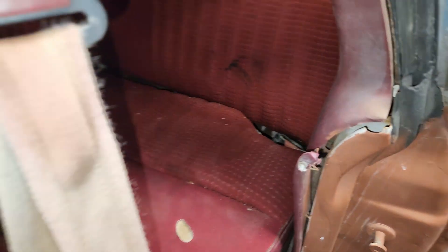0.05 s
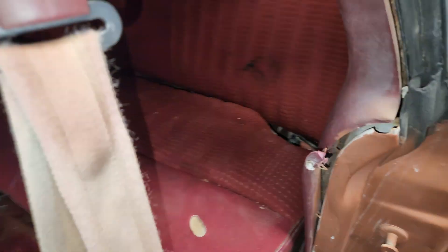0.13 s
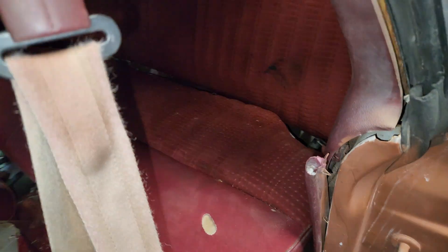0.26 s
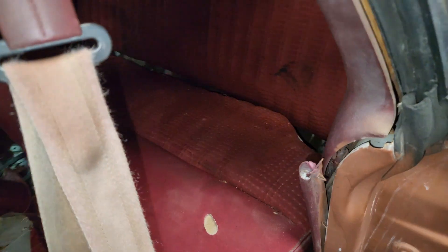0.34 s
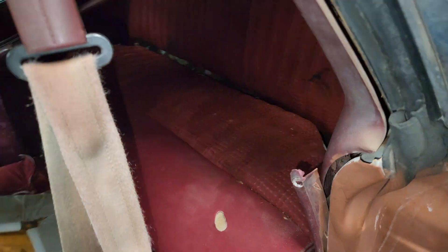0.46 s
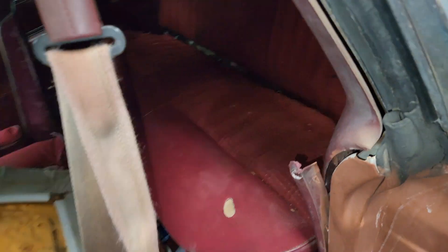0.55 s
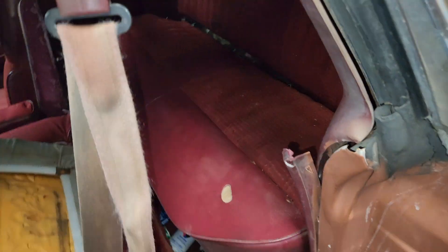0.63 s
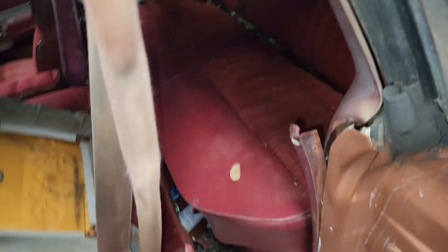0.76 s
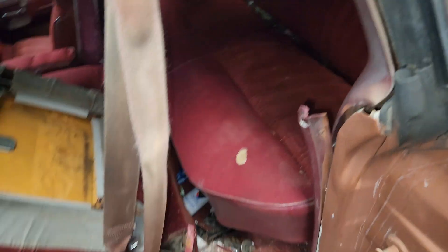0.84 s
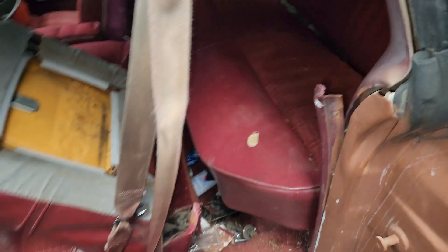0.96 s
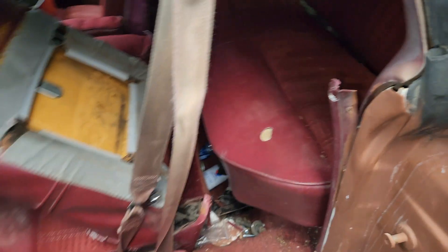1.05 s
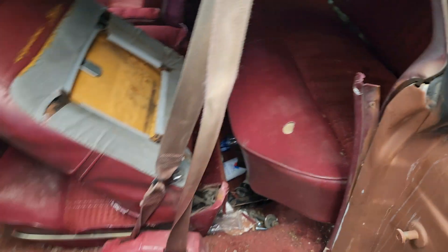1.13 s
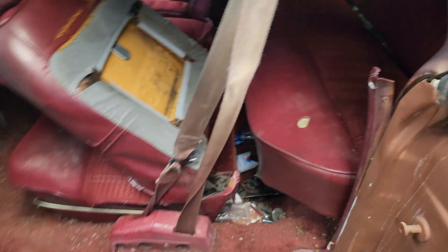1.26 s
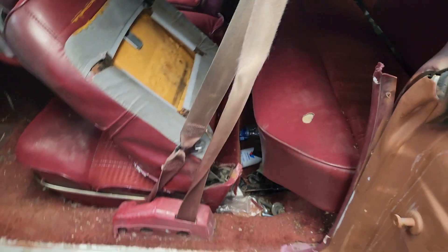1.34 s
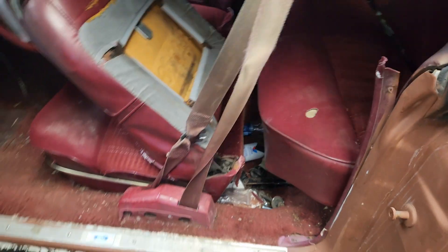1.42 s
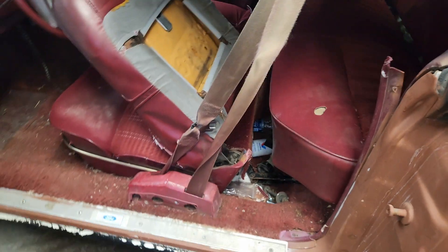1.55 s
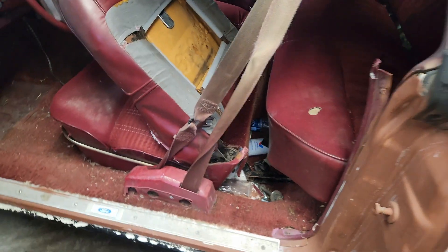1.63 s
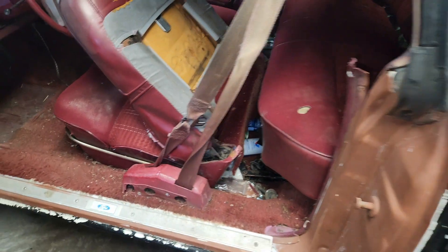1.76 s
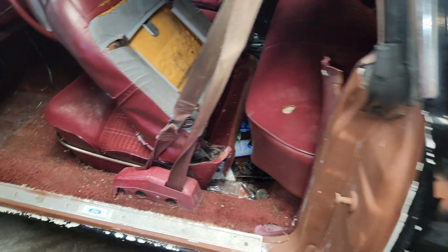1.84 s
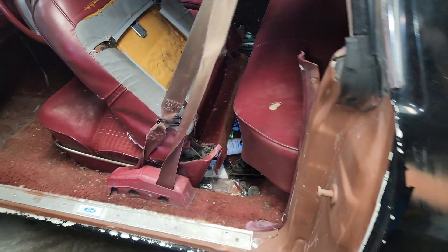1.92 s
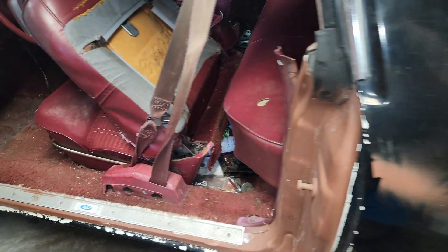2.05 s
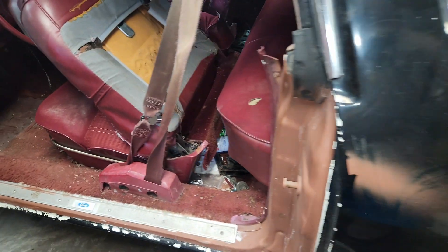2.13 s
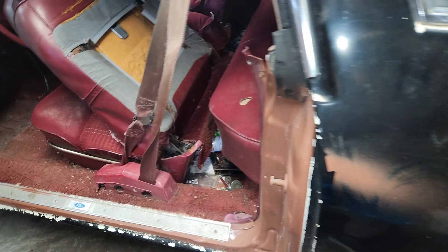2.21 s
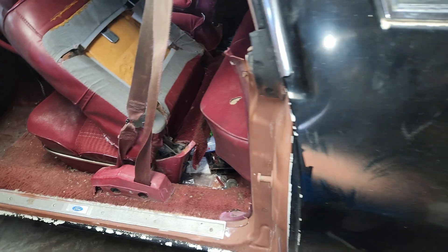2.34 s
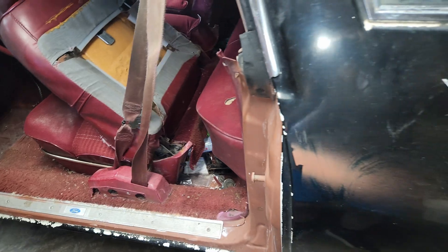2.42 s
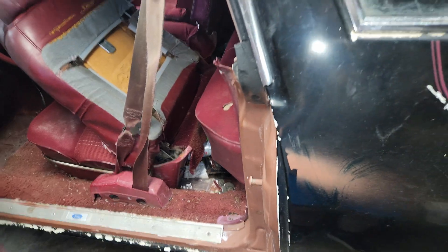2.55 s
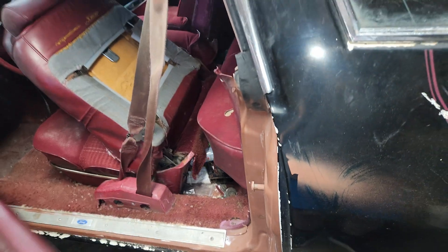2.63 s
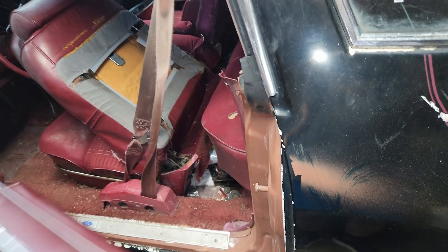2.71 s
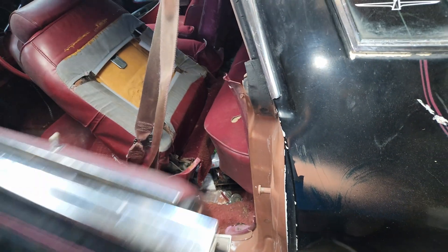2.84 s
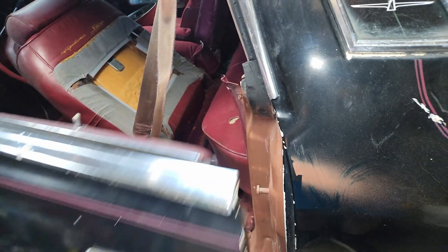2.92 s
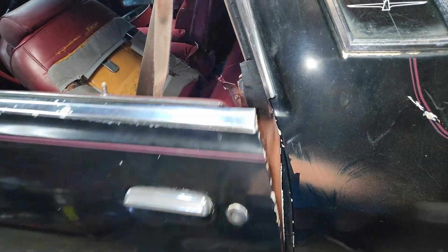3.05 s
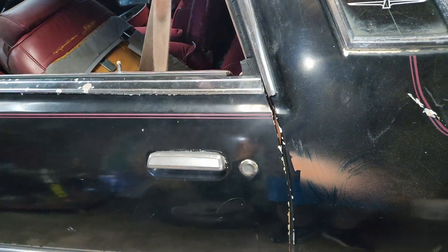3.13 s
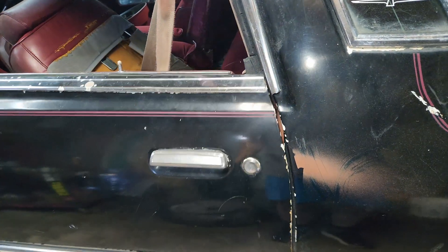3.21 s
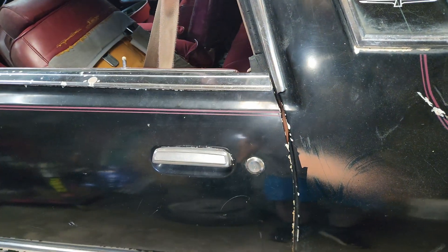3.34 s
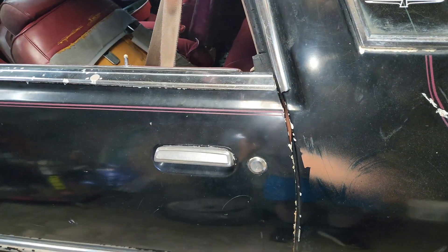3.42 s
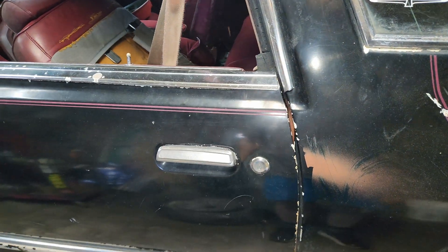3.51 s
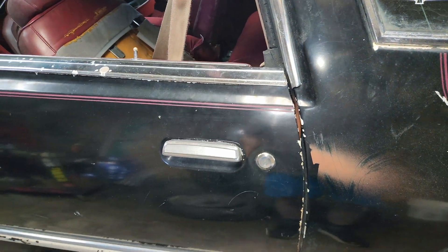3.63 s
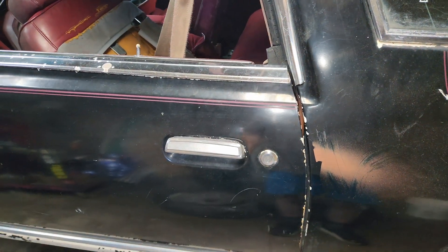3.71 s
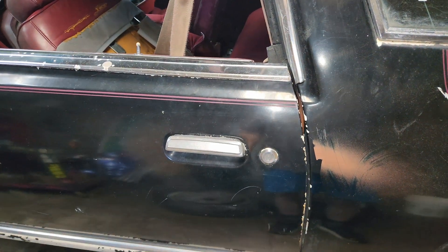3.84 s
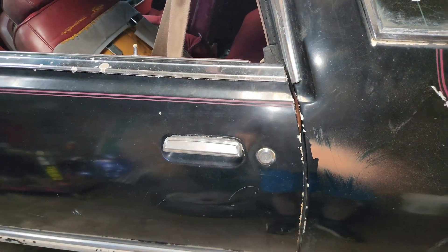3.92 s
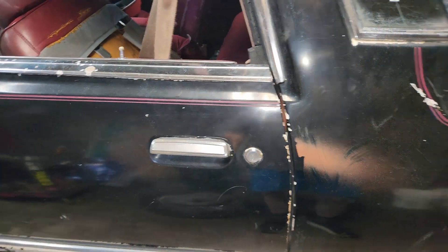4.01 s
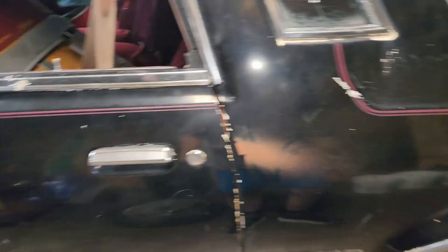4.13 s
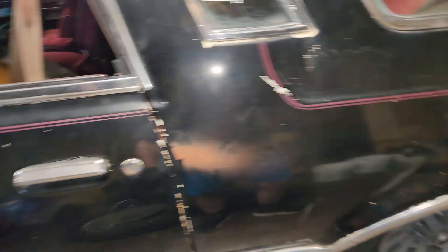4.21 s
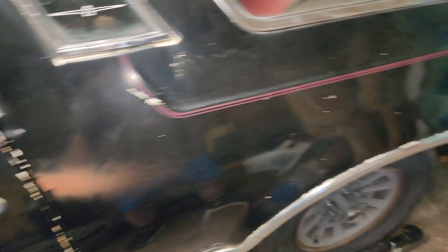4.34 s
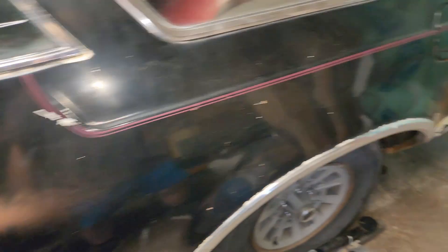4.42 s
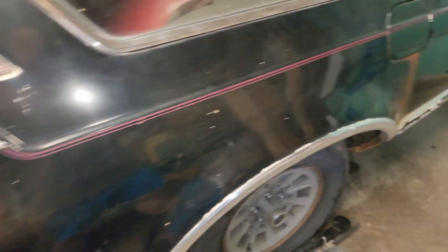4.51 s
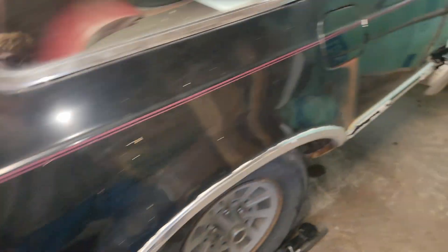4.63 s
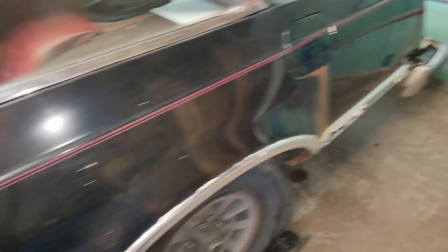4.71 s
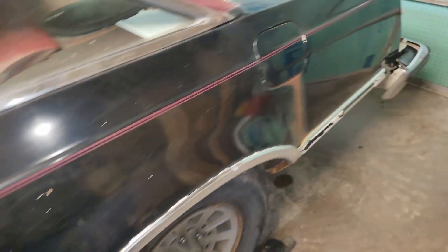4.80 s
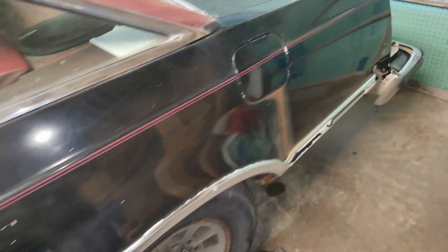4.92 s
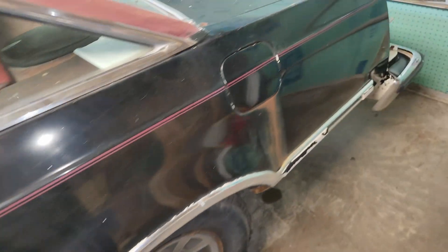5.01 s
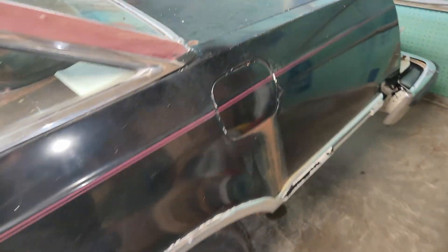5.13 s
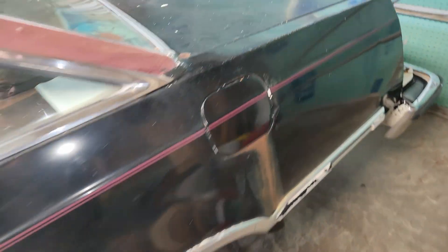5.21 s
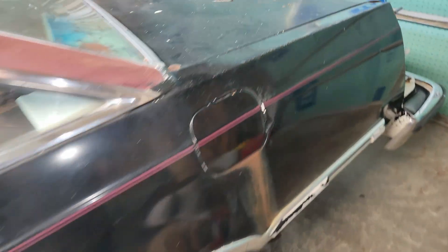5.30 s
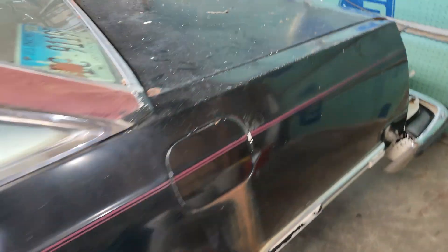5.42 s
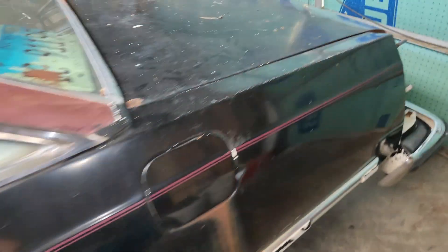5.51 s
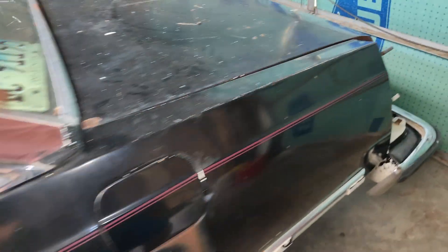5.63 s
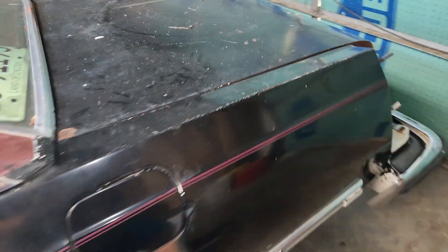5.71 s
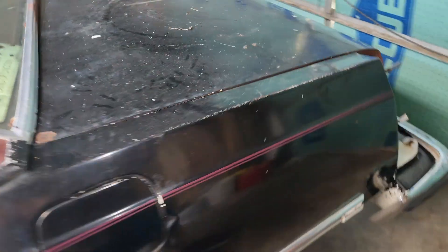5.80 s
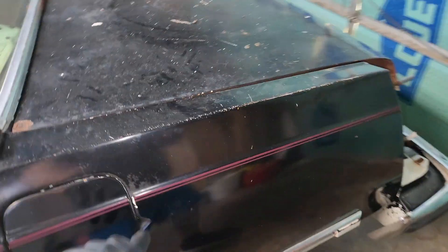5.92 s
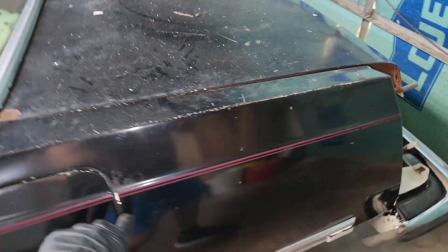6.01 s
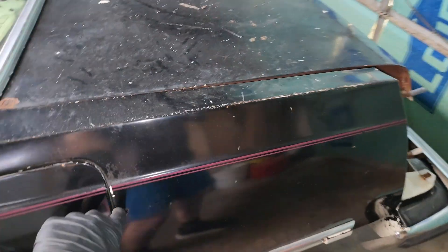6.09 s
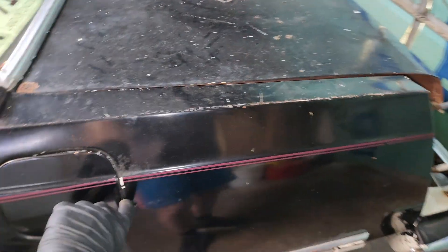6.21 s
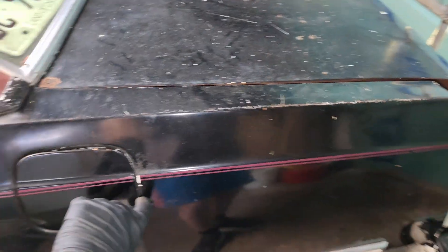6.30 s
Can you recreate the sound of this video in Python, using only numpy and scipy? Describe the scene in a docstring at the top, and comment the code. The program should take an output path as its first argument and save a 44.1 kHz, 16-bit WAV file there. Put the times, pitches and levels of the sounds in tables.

```python
"""Far traffic rumbles and shoes scuff a gritty garage floor, knocks and ticks come and go; midway a heavy old
car door hums on its hinge and slams, and the shoes go on. Latch, seal and loose glass hit in a quick train:
noise cracks for steel, and damped modes and sheet noise for door skin and cabin. The shoes are grainy noise,
band-passed by a gliding hollow. Concrete walls answer with a tail of decaying noise, and two microphone ports
hear it all."""
import sys
import numpy as np
from scipy import signal
from scipy.fft import rfft, irfft, next_fast_len
from scipy.io import wavfile
from scipy.ndimage import map_coordinates

SR = 44100
rng = np.random.default_rng(int(sys.argv[2]) if len(sys.argv) > 2 else 0)


def transcribe(signal):
    """Save signal, clipped to [-1, 1], as a 16-bit WAV file at the path in sys.argv[1]."""
    frames = np.atleast_2d(signal).T
    limited = np.clip(frames, -1, 1)
    pcm = np.round(limited * 32767).astype(np.int16)
    wavfile.write(sys.argv[1], SR, pcm)


N = 280255

# How alike left and right hear far sound, by frequency: f/Hz, likeness (1 same, -1 opposite)
FAR_LIKENESS = [(60, 0.98), (180, 0.99), (550, 0.59), (1650, -0.21), (4970, -0.089), (15000, -0.11)]
# The same for sound close to the microphone: f/Hz, likeness
NEAR_LIKENESS = [(60, 0.92), (180, 0.88), (550, 0.77), (1650, 0.21), (4970, -0.06), (15000, -0.42)]


def amp(db):
    """dB to gain."""
    return 10 ** (np.asarray(db) / 20)


def unit(x):
    """Scaled to rms 1."""
    return x / np.sqrt(np.mean(x ** 2) + 1e-20)


def along(points, hz):
    """Reads (f/Hz, value) points on a log frequency axis."""
    f, value = np.transpose(points)
    return np.interp(np.log(hz + 1), np.log(f + 1), value)


def wobble(rate):
    """A smooth random curve, rate knots a second."""
    knots = rng.standard_normal(int(N * rate / SR) + 4)
    return map_coordinates(knots, [np.arange(N) * rate / SR])


def filtered(x, response):
    """x times a response of frequency, padded so that its end does not wrap round."""
    n = x.shape[-1]
    m = next_fast_len(n + 8192)
    spectrum = rfft(x, m) * response(np.fft.rfftfreq(m, 1 / SR))
    return irfft(spectrum, m)[..., :n]


def rush(spectrum, alike, size=N):
    """Stereo noise of rms 1; the mid-to-side balance at each frequency sets the left-right likeness."""
    def mid_side_gain(hz):
        turn = np.arccos(np.clip(along(alike, hz), -1, 1)) / 2
        return amp(along(spectrum, hz)) * [np.cos(turn), np.sin(turn)]

    mid, side = filtered(rng.standard_normal((2, size)), mid_side_gain)
    return unit(np.array([mid + side, mid - side]))


def door():
    """The slam: steel cracks and a ringing latch over thuds; skin and cabin drive each hold, then die away."""
    # Latch, seal and glass contacts: t/s, strength/dB, skin centre f/Hz, boom centre f/Hz
    contacts = [(3.1104, 0, 923, 200), (3.1129, 4, 396, 200), (3.1204, 2.5, 390, 199),
                (3.1287, 3.5, 1370, 201), (3.1376, -3, 800, 200), (3.1462, 1, 430, 65.5),
                (3.167, -5.5, 1700, 300), (3.1789, -7.5, 500, 79.9), (3.1855, 0, 1130, 200),
                (3.1904, -1, 1102, 399), (3.2093, -2, 450, 111.3), (3.2312, -3.5, 450, 203),
                (3.252, 0, 400, 147.6), (3.2854, -1, 451.4, 94), (3.3403, -2, 292, 107.7),
                (3.395, -2, 239, 205), (3.4295, -2, 301.5, 108.3), (3.5064, 0, 349, 65),
                (3.5981, 1.5, 269, 114.2)]
    # Latch steel meets the striker, then rattles: t/s, level/dB
    strikes = [(3.1055, -30.5), (3.1104, -15.5), (3.1135, -9), (3.1203, -14), (3.1286, -11.5),
               (3.1376, -12.5), (3.1545, -20), (3.1789, -20), (3.2096, -31), (3.262, -31), (3.545, -64)]
    # Spectrum of steel on steel: f/Hz, level/dB per Hz
    crack_spectrum = [(900, -27), (1500, -7), (2900, -7), (3450, -14.5), (4000, -10), (5600, -7.5),
                      (7460, -8.5), (9000, -13.5), (14300, -13.5), (16000, -17.5)]
    # Latch modes: f/Hz, level/dB, t60/s before the damping factor
    latch_modes = [(2208, -0.5, .03), (5650, -1.5, .03), (7560, -1.5, .03)]

    out, t = np.zeros((2, N + SR)), np.arange(SR // 4) / SR
    crack_envelope = amp(-60 * t / 0.086) * (1 - np.exp(-t / 0.001))  # t60 and attack in s
    for at, crack_db in strikes:
        crack = crack_envelope * rush(crack_spectrum, NEAR_LIKENESS, size=len(t))
        latch = amp(-6) * ring(latch_modes, t, damping=0.84, attack=.0004, centre=5000, octaves=10)
        out[:, round(at * SR):][:, :len(t)] += amp(crack_db) * (crack + latch)

    s, strength_db, skin_hz, boom_hz = np.transpose(contacts)

    def drive(full_db, until_s, loss_db_per_s):
        return full_db - loss_db_per_s * np.maximum(0, s - until_s)

    skin_db = strength_db + drive(full_db=-16, until_s=3.22, loss_db_per_s=200)
    boom_db = drive(full_db=-8.5, until_s=3.279, loss_db_per_s=79.1)
    # the cabin air is squeezed ever harder until the seal closes
    sealed_s, squeeze_db_per_s = 3.144, 700
    boom_db = boom_db - squeeze_db_per_s * np.maximum(0, sealed_s - s)
    boom_db = boom_db + 0.6 * strength_db  # share of a contact's strength that reaches its boom
    boom_db = boom_db - 4 * np.log2(np.maximum(boom_hz / 110, 1))  # dB per octave lost above 110 Hz
    body = np.transpose([s, skin_db, skin_hz, boom_db, boom_hz, np.ones(len(s))])
    return out[:, :N] + thuds(body, sheet_t60=0.073, ring_db=3.0, damping=0.22, boom_damping=0.45)


def thuds(table, sheet_t60, ring_db, damping, boom_damping):
    """Each blow, of slam or knocks, sounds as dense noise and damped modes around a centre, over a low boom."""
    # Dense ring of sheet metal: f/Hz, level/dB per Hz
    sheet_spectrum = [(150, -30), (250, 0.5), (702, -5.5), (798, -2.5), (971, -12.5), (1130, -9),
                      (1550, -9), (4000, -21), (5200, -55.5), (8800, -120)]
    # Door skin modes: f/Hz, level/dB, t60/s before the damping factor
    skin_modes = [(228.7, 3.5, 0.51), (379, 4.5, 0.2), (431.6, -3.5, 0.22), (520, -5, 0.28),
                  (764, -6.5, 0.22), (1140, -1, 0.14), (1669, -12, 0.41), (1860, -16, 0.22)]
    # Cabin air and door frame modes: f/Hz, level/dB, t60/s before the damping factor
    cabin_modes = [(59, -1.5, 0.64), (83.3, 4, 0.43), (92, -1.5, 0.17), (116.3, 3.5, 0.43),
                   (150, -2.5, 0.3), (193.2, -1.5, 0.22)]

    out, t = np.zeros((2, N + SR)), np.arange(SR // 2) / SR
    for s, skin_db, skin_hz, boom_db, boom_hz, lasts in table:
        noise = rush(sheet_spectrum, NEAR_LIKENESS, size=len(t))
        sheet = unit(filtered(noise, lambda hz: near(hz, skin_hz, 0.79)))
        sheet = sheet * amp(-60 * t / (lasts * sheet_t60)) * (1 - np.exp(-t / .0004))
        skin = sheet + amp(ring_db) * ring(skin_modes, t, lasts * damping, 0.0011, skin_hz, 0.5)
        boom = ring(cabin_modes, t, lasts * boom_damping, 0.001404, boom_hz, 0.51)
        out[:, round(s * SR):][:, :len(t)] += amp(skin_db) * skin + amp(boom_db) * boom
    return filtered(out[:, :N], lambda hz: (hz / (hz - 28j)) ** 2)  # a panel moves little air below its size


def ring(modes, t, damping, attack, centre, octaves):
    """Damped modes; each blow draws slightly different mode pitches and strengths at random."""
    hz, db, t60 = np.transpose(modes)[:, :, None]
    hz = hz * (1 + 0.013 * rng.standard_normal(hz.shape))
    size = amp(db) * near(hz, centre, octaves)
    size = size * amp(rng.normal(0, 1, db.shape)) / np.linalg.norm(size)
    decay = amp(-60 * t / (damping * t60))
    wave = np.sum(size * decay * np.sin(2 * np.pi * hz * t), axis=0)
    return wave * (1 - np.exp(-t / attack))


def near(hz, centre, octaves):
    """A contact of given hardness drives mostly the frequencies around a centre."""
    return 1 / (1 + (np.log2((hz + 1) / centre) / octaves) ** 2)


def swing():
    """The hinge keeps one frame mode humming unevenly while the pushed door travels."""
    # Hum of the moving door, before the wobble: t/s, level/dB
    hum_levels = [(2.36, -62), (2.42, -44.5), (2.8, -48.5), (3.05, -52), (3.121, -67.5)]
    s, level_db = np.transpose(hum_levels)
    t = np.arange(N) / SR
    hum = np.sin(2 * np.pi * 114 * t + .9 * wobble(35))
    level_db = np.interp(t, s, level_db, left=-120, right=-120)
    return amp(level_db + 4 * wobble(22)) * hum


def scuffs():
    """A sole drags over grit: spiky hiss, and the air gap under the sole sings at a moving pitch."""
    # Drags of the shoes: start t/s, rise/s, hold/s, fall/s, grit level/dB, treble tilt/dB per octave,
    # hollow level under the sole/dB, hollow f/Hz, glide/octaves per s, Q, left-right/dB
    drags = [(0.216, 0.12, 0.13, .04, -53.5, 8, -57.5, 2300, -1, 1.03, 3.5),
             (0.992, .003, 0.0087, 0.1, -53.5, -3.5, -51.5, 2300, 3.5, 4.9, -2),
             (1.152, 0.053, 0.11, 0.05, -59, 2.5, -51.5, 2030, 2, 2.2, -1.5),
             (1.275, 0.032, .035, .015, -70, -3, -48, 1970, -2, 4.3, -7.5),
             (1.337, .01, 0.14, .05, -66.5, -3, -87, 1850, 0, 3, 2),
             (1.582, 0.0033, .003, 0.051, -60, 2, -66, 1000, 2, 1.8, 3),
             (1.799, .012, 0.019, .1, -59.5, -3, -59.5, 1600, 2, 1.6, 0),
             (1.962, 0.22, 0.056, 0.064, -58, -2, -60, 1790, -1, 3.3, 0.5),
             (2.2, 0.024, 0.0068, 0.037, -75, -1.5, -52.5, 1890, 2, 15, -10),
             (2.319, 0.021, 0.13, 0.084, -53.5, -0.5, -49.5, 1620, 1.5, 2, -1),
             (2.578, 0.078, 0.09, 0.18, -68, 3, -66, 1600, -2, 2, 3),
             (3.979, 0.057, 0.0041, 0.095, -61, -2.5, -54.5, 1500, 3, 4.8, -3),
             (4.396, 0.061, .004, 0.13, -64, 0, -64, 1650, -2.5, 1.5, -0.5),
             (4.869, 0.086, .02, .4, -65.5, -3.5, -74, 1600, 7, 1.5, 2),
             (5.177, 0.0029, 0.0042, 0.27, -63.5, -3.5, -65, 1500, -4, 1.5, -3),
             (5.2, 0.14, .01, 0.17, -58.5, -3.5, -59.5, 1568, 1, 1.9, -.5),
             (5.745, 0.0068, 0.03, 0.04, -53.5, 0, -52.5, 4670, -6.5, 5.7, -3),
             (5.75, 0.0042, 0.055, 0.14, -58, 2.5, -58.5, 1840, -6, 1.5, -5),
             (5.853, 0.059, 0.0096, 0.12, -64.5, -2.5, -55, 1840, 1, 1.7, -2),
             (6.021, .003, .004, 0.24, -68.5, -0.5, -78, 1300, 0, 1.5, -2.5),
             (6.132, 0.02, 0.0028, 0.03, -61.5, 5, -77, 1400, -1, 1.5, -2.5),
             (6.187, 0.0057, 0.093, 0.053, -54, 5, -43, 2070, -0.5, 2.1, -1.5)]
    # Spectrum of the grit: f/Hz, level/dB per Hz
    grit_spectrum = [(1760, -28), (3000, -5.5), (4080, -10.5), (4570, -8), (4970, -8.5), (7350, -9),
                     (8700, -14), (14600, -20.5), (16000, -13.5)]
    fade_db, crown_db = 22, 3  # drop over each rise or fall time, swell in mid drag

    grains = rush([(300, 0)], [(300, 0.41)])
    grains = grains * unit(amp(2.2 * wobble(600)))  # single grains catch and let go
    hz, t, z = signal.stft(grains, SR, nperseg=256, noverlap=192)
    f, power = hz[:, None] + 1, np.zeros(z.shape)

    def norm(shape):
        return shape / np.mean(shape, axis=0)

    for start, rise, hold, fall, grit_db, tilt_db, hollow_db, hollow_hz, glide, sharp, pan_db in drags:
        on = (t >= start - rise) & (t <= start + rise + hold + 2 * fall)
        into = t[on] - start - rise  # s since the hold began
        press_db = fade_db * np.minimum(0, np.minimum(into / rise, (hold - into) / fall))
        press_db = press_db + crown_db * np.sin(np.pi * np.clip(into / hold, 0, 1))
        centre = hollow_hz * 2 ** (glide * (into - hold / 2))
        grit = norm(amp(along(grit_spectrum, f) + tilt_db * np.log2(f / 7000)) ** 2)
        hollow = norm(1 / (1 + (sharp * (f / centre - centre / f)) ** 2) ** 1.32)
        both = amp(grit_db) ** 2 * grit + amp(hollow_db) ** 2 * hollow
        pan = amp(np.array([1, -1])[:, None, None] * pan_db)  # on power: half the dB up left, half down right
        power[..., on] += both * amp(press_db) ** 2 * pan
    drag = signal.istft(z * np.sqrt(power), SR, nperseg=256, noverlap=192)[1][:, :N]
    return drag * unit(amp(0.59 * wobble(70)))  # the sole stutters


def garage(x):
    """Each frequency of the walls' answer dies at its own speed; the deepest bass leaves by the open front."""
    # Decay of the concrete room: f/Hz, t60/s
    decay_times = [(60, 0.62), (200, 0.92), (700, 0.55), (2500, 0.58), (6000, 0.46), (12000, 0.33)]
    noise = rush([(40, -13.5), (200, -7.0), (500, -4.5)], FAR_LIKENESS, size=SR)
    hz, t, z = signal.stft(noise, SR, nperseg=512)
    decay = amp(-60 * t / along(decay_times, hz)[:, None])
    tail = signal.istft(z * decay, SR, nperseg=512)[1]
    before_s = .012  # wait before the walls answer
    tail = np.pad(tail, ((0, 0), (round(before_s * SR), 0))) / np.linalg.norm(tail[0])
    return signal.fftconvolve(x.mean(axis=0)[None], tail, axes=1)[:, :N]


def traffic():
    """Far traffic as two noise bands: rumble that swells in lumps, and a steadier drone."""
    # Slow course of the traffic, before the wobble: t/s, rumble level/dB, drone level/dB
    levels = [(0, -43.5, -59.5), (.2, -48.5, -57), (1.2, -50.5, -53.5), (2.202, -48, -53.5),
              (3, -46.5, -51), (3.8, -49, -59), (4.7, -51, -56.5), (5.53, -50.5, -56.5), (6.35, -53.5, -53)]
    # Spectrum of the rumble: f/Hz, level/dB per Hz
    rumble_spectrum = [(12, -28), (20, -5.5), (38, 1.5), (49, -3), (86, -2.5), (117, -5.5), (146, -31),
                       (200, -29), (260, -47.5), (440, -120)]
    # Spectrum of the drone: f/Hz, level/dB per Hz
    drone_spectrum = [(82, -33), (140, -6), (204, -4.5), (400, -4), (595, -12), (726, -9), (1290, -17),
                      (1840, -16), (2910, -19.5), (3990, -32.5), (7530, -34.5), (9000, -46.5), (16000, -54)]
    s, rumble_db, drone_db = np.transpose(levels)
    t = np.arange(N) / SR
    rumble_gain = amp(np.interp(t, s, rumble_db) + 1.5 * wobble(11.0))
    drone_gain = amp(np.interp(t, s, drone_db) + 1.4 * wobble(7.1))
    rumble = rumble_gain * rush(rumble_spectrum, FAR_LIKENESS)
    return rumble + drone_gain * rush(drone_spectrum, FAR_LIKENESS)


def scene():
    """Door, knocks and shoes in the garage, over the traffic."""
    # Knocks and short bright grit ticks around the door and shoes: t/s, upper level/dB, upper centre f/Hz,
    # boom level/dB, boom centre f/Hz, ring length as a share of the usual
    knock_table = [(.3978, -38.5, 840, -35, 194, 0.46), (.9931, -45.5, 3000, -35.5, 161, .6),
                   (1.0061, -51, 2250, -42, 115, 1.01), (2.4094, -38, 763, -42, 113, 1.2),
                   (2.6133, -34, 880, -34, 190, .8), (2.6152, -40.5, 375, -26, 100, 1.3),
                   (2.6255, -34, 347, -25, 196, 1.3), (2.6344, -40.5, 675, -41, 186, 1.1),
                   (2.6894, -52, 400, -30, 70, 1.01), (2.7614, -56, 400.3, -35.5, 100, .7),
                   (5.816, -48.5, 1050, -62, 115, .5), (6.0344, -51, 292, -35, 182, 1.01),
                   (6.0794, -53, 303, -34, 136.5, 1.01), (6.2455, -26.5, 2070, -57, 116, .3)]
    slam, shoes = door(), scuffs()
    knocks = thuds(knock_table, sheet_t60=0.099, ring_db=-3.5, damping=0.21, boom_damping=0.444)
    echoes = garage(amp(-5.5) * slam + amp(-9) * knocks + amp(-6.0) * shoes)
    return slam + knocks + shoes + echoes + swing() + traffic()


def record(dry):
    """The two ports differ in colour, peaks round off at full scale, nothing passes above the band limit."""
    # Colour of the microphone ports: f/Hz, left-right level/dB
    port_colour = [(60, 1), (350, 1.5), (1400, -2), (2800, 0), (5600, -2.5), (10000, 3.5)]
    top_hz, slope_hz = 15830, 300  # full response up to top_hz, silence slope_hz above it
    ports = filtered(dry, lambda hz: amp(np.array([[.5], [-.5]]) * along(port_colour, hz)))
    rounded = ports / (1 + np.abs(ports) ** 4) ** (1 / 4)
    return filtered(rounded, lambda hz: np.clip((top_hz + slope_hz - hz) / slope_hz, 0, 1) ** 2)


dry = scene()
out = record(dry)
transcribe(out)
```